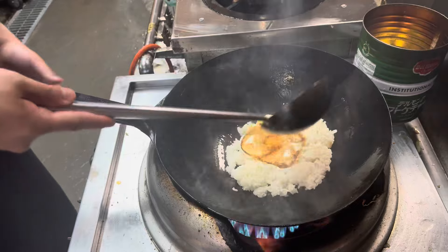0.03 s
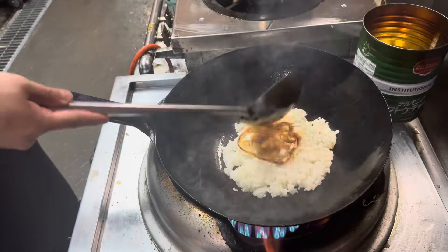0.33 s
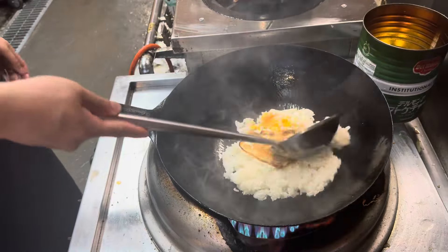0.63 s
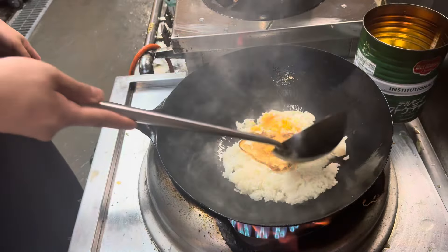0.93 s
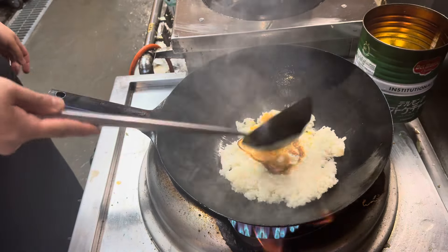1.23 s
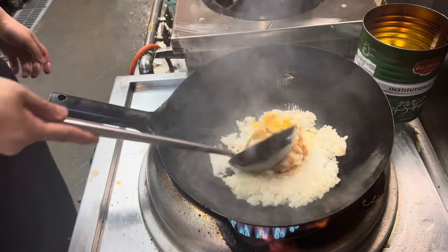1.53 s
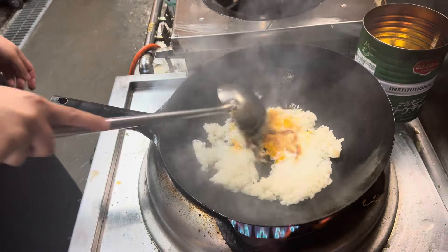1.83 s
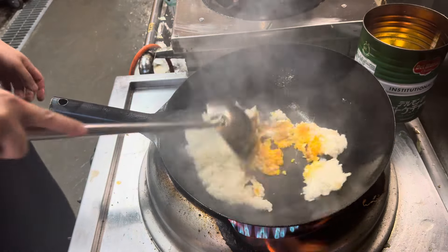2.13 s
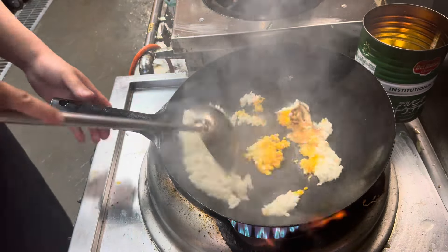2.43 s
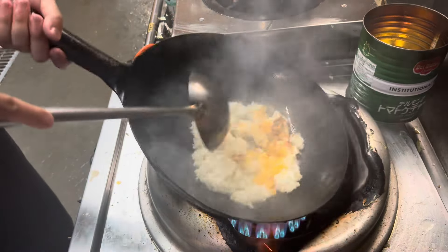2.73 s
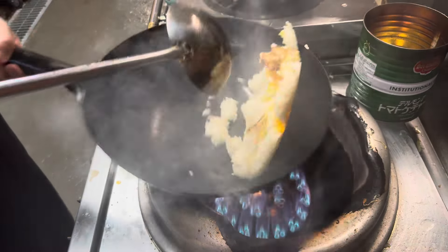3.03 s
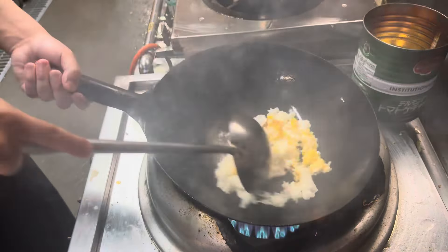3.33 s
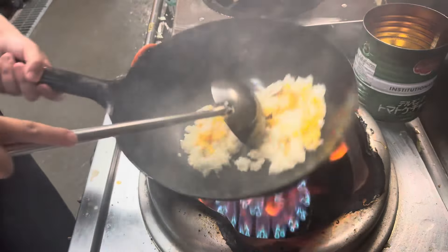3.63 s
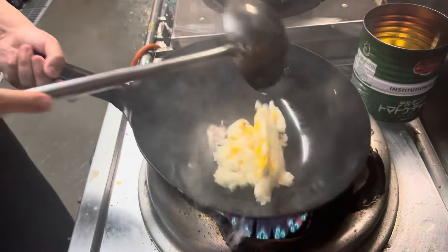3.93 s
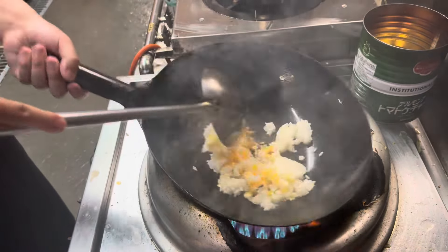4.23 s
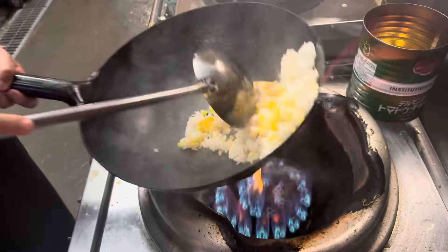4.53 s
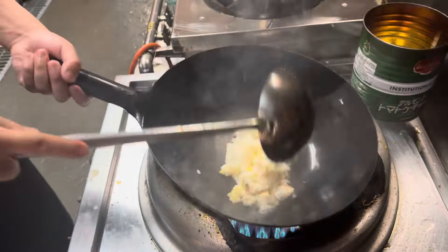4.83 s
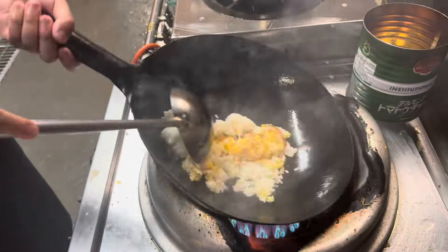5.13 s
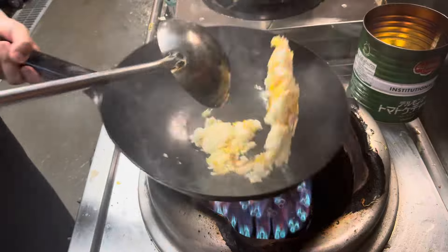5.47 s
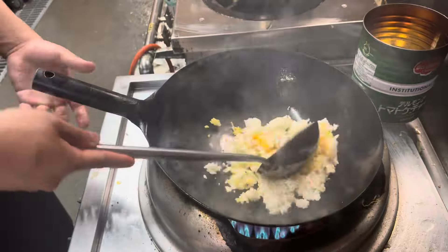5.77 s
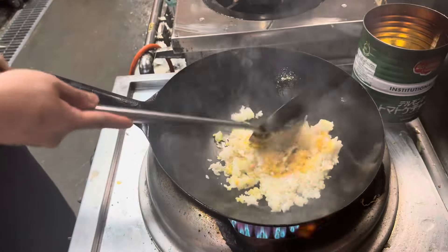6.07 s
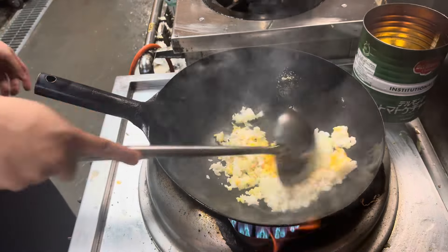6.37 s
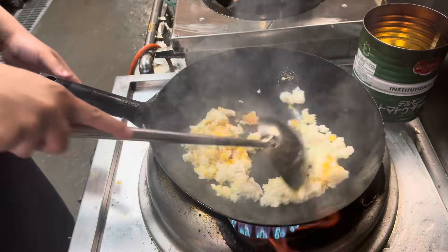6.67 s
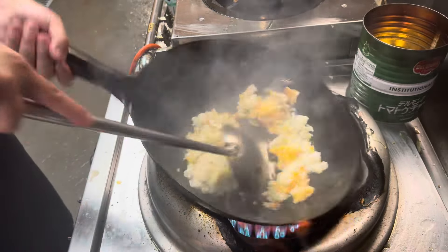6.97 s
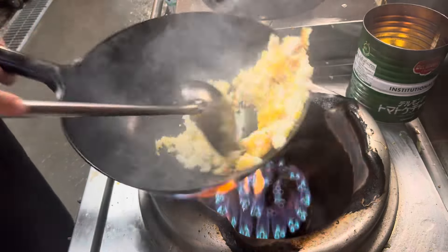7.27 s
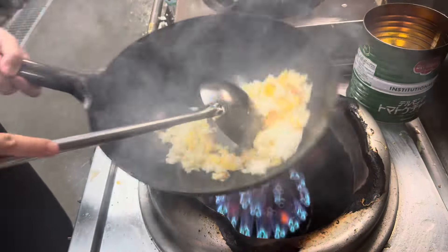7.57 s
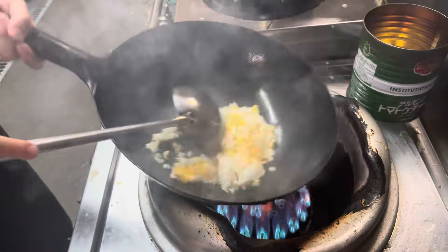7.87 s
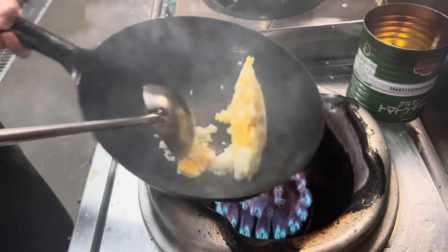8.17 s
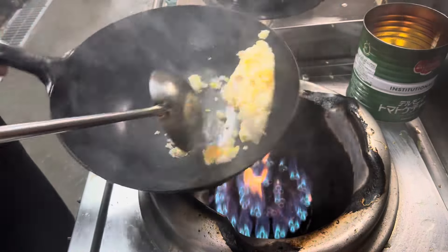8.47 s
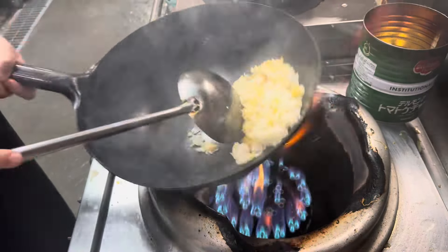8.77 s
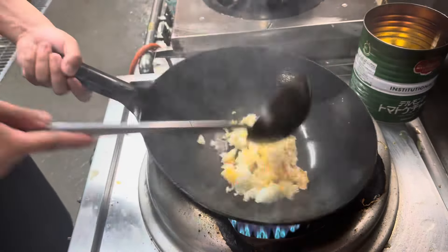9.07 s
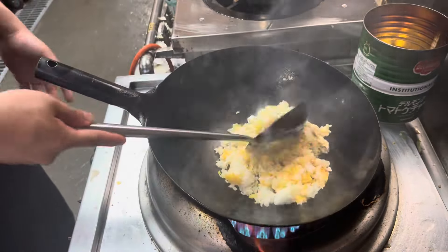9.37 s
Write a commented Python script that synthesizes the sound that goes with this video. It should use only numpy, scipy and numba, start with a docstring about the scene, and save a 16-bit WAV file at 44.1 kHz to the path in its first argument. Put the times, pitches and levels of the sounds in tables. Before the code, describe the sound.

Oil hisses and crackles in a wok of egg and rice above the steady rumble of a gas flame. Ladle strokes start soft and wet, then turn to bright scrapes and ringing clanks. Repeated tossing follows: the wok grinds, shudders and drops onto its iron ring with hollow, rattling thuds, and the sizzle dips briefly with each toss. The microphone is an arm's length away, with a short, dull kitchen echo.

```python
"""Egg and rice fry in a steel wok, close to a phone in a hard-walled kitchen. From the start a gas
burner roars, oil sizzles and spits, and a long ladle jabs and scrapes. After a second the wok begins
to grind over the iron burner ring; then the ladle clanks on it and squeals on bare steel. From about
2.7 s the cook tosses the rice again and again: the wok drops onto the ring and rattles to rest, or
slips off and wobbles, and the frying dips while the rice is in the air. It last lands at about 9 s."""
import sys
import numpy as np
from scipy import signal
from scipy.fft import rfft, irfft
from scipy.io import wavfile
from scipy.ndimage import uniform_filter1d
from numba import njit

SR = 44100
rng = np.random.default_rng(int(sys.argv[2]) if len(sys.argv) > 2 else 0)


def materialize(psi):
    """Save the field psi as 16-bit PCM at rate SR to the path in sys.argv[1].

    A 1-D psi becomes a single channel; in a 2-D psi each row is a channel.
    """
    bounded = np.clip(np.atleast_2d(psi).T, -1, 1)
    quanta = np.round(bounded * 32767).astype(np.int16)
    wavfile.write(sys.argv[1], SR, quanta)


N = 423360  # 9.6 s
TIME = np.arange(N) / SR
AGE = np.arange(SR) / SR  # one second, counted from a blow
MIC_LAG_S = 5.3e-5

# the ladle's natural tones; ring time is the time to fade by 60 dB: (pitch [Hz], level [dB], ring time [s])
LADLE_TONES = [(2000, -13, .26), (2262, -13, .25), (2410, -8, .19), (2453, -5, .22), (2545, -8, .3),
               (2633, -7, .35), (2816, -4, .22), (2880, -11, .2), (2978, -4, .16), (3150, -7, .25),
               (3285, -7, .25), (3490, -6, .3), (3660, -7, .3), (3770, -5, .2), (3960, -7, .3),
               (4030, -4, .17), (4120, -2, .2), (4430, -6, .2), (4600, -3, .24), (4787, -1, .16),
               (5280, -1, .2), (6131, -1, .2), (6400, -4, .2), (7235, -4, .14)]
# the wok's natural tones: (pitch [Hz], level [dB], ring time [s])
WOK_TONES = [(184, 2, .45), (243, -2, .4), (294, -5, .4), (363, -3, .35), (449, -2, .45), (506, -2, .45),
             (642, -3, .4), (696, -4, .37), (734, -4, .45), (816, -9, .38), (979, -9, .25), (1136, -14, .3),
             (1219, -9, .36), (1556, -17, .35), (1825, -19, .4)]
# the low grinding noise of the wok: (frequency [Hz], level [dB])
GRIND_SPECTRUM = [(110, 6), (190, 7), (380, 7.5), (600, 1.5), (1000, -11), (1600, -48), (3000, -21)]
# the wok lands on the burner ring; the last levels are relative to the first:
# (time [s], level [dB], rattle length [s], rattle [dB], thud pitch [Hz], rim note [dB], snap [dB])
WOK_LANDINGS = [(2.679, -5, 0.043, -17, 580, -34, -24), (3.195, -4, 0.061, -9.5, 643, -21, -33),
                (3.5115, -7.5, 0.046, -31, 604, -30, -26), (3.9997, -3, 0.072, -12.5, 695, -4.5, -30),
                (4.833, -4.5, 0.079, -12.5, 704, -5.5, -32), (5.167, -15, 0.029, -21, 590, -24, -15),
                (5.614, -7, 0.075, -7.5, 620, 4.5, -11), (6.9632, -5.5, 0.037, -18.5, 566, -17, -17),
                (9.068, -7.5, 0.065, -17.5, 507, -8, -47)]


def undb(db):
    """Turn decibels into a factor to multiply by."""
    return 10 ** (np.asarray(db) / 20)


def unit(x):
    """Scale a signal to an average (rms) level of 1."""
    return x / np.sqrt(np.mean(x ** 2))


def curve(table):
    """Join (time, value) points with straight lines."""
    return np.interp(TIME, *np.transpose(table))


def add(track, s, sound):
    """Mix a sound into a track, starting at s seconds."""
    start = int(s * SR)
    track[start:start + len(sound)] += sound[:N - start]


def colour(x, spectrum):
    """Filter by (frequency [Hz], level [dB]) points, fading beyond them; white noise keeps its level."""
    hz, db = np.transpose(spectrum)
    f = np.maximum(np.fft.rfftfreq(x.shape[-1], 1 / SR), 1)
    ends = np.minimum(1, np.minimum(f / hz[0], hz[-1] / f)) ** 2
    gain = unit(ends * undb(np.interp(np.log(f), np.log(hz), db)))
    return irfft(rfft(x) * gain, x.shape[-1])


def passband(x, order, hz, kind):
    """Keep the "low", "high" or "band" part of a sound; a higher order cuts more steeply."""
    return signal.sosfilt(signal.butter(order, hz, kind, fs=SR, output="sos"), x)


@njit
def resonance(x, hz, q):
    """Keep a band around a moving pitch; a higher q makes it narrower."""
    out, band_state, low_state = np.empty(len(x)), 0., 0.
    for i in range(len(x)):
        g = np.tan(np.pi * hz[i] / SR)
        band = (band_state + g * (x[i] - low_state)) / (1 + g * (g + 1 / q))
        band_state = 2 * band - band_state
        low_state += 2 * g * band
        out[i] = band / q
    return out


def wander(rate):
    """A smooth random drift that heads for a new value `rate` times a second."""
    hold = int(SR / rate)
    steps = np.repeat(rng.standard_normal(N // hold + 1), hold)
    return unit(uniform_filter1d(uniform_filter1d(steps, hold), hold)[:N])


def clicks(per_s, spread_db):
    """Random tiny clicks, mostly small and a few large."""
    size = undb(spread_db * np.minimum(rng.exponential(size=N), 7))
    return unit((rng.random(N) < per_s / SR) * size * rng.choice([-1, 1], N))


def fade(t60):
    """Dying away after a blow, by 60 dB in t60 seconds."""
    return np.exp(-np.log(1000) * AGE / t60)


def ring(tones, spot_db=0.0):
    """Struck metal: fading tones whose balance varies at random, as with the spot that is hit."""
    hz, db, t60 = np.transpose(tones)
    gain = undb(db + spot_db * rng.standard_normal(len(db)))
    gain = gain / np.sqrt(np.sum(gain ** 2) / 2)
    return sum(g * fade(t) * np.sin(2 * np.pi * (f * AGE + rng.random()))
               for f, g, t in zip(hz, gain, t60))


def wash(spectrum, t60):
    """Countless overlapping tones, heard as a dying noise."""
    return colour(rng.standard_normal(SR), spectrum) * fade(t60)


def swoop(start_hz, end_hz, length):
    """Bending waves in sheet steel: the high ones arrive first, so the pitch falls."""
    progress = np.minimum(AGE / length, 1)
    hz = start_hz * (end_hz / start_hz) ** progress
    return np.sin(np.pi * progress ** 1.2) * np.sin(2 * np.pi * np.cumsum(hz) / SR)


def gesture(s, rise, hold, fall):
    """One movement of the hand: it builds up, holds and dies away (all in seconds)."""
    age = TIME - s
    return np.clip(age / rise, 0, 1) * np.exp(-np.clip((age - rise - hold) / fall, 0, 20))


def two_mics(x, lag):
    """The direct sound reaches the phone's right microphone slightly late."""
    delay = np.exp(-2j * np.pi * np.fft.rfftfreq(N, 1 / SR) * lag)
    return np.array([x, irfft(rfft(x) * delay, N)])


def diffuse(count):
    """Noise from all sides: the two microphones agree only in the bass."""
    mid, side = rng.standard_normal((2, count))
    side = passband(side, 2, 260, "high")
    return np.array([mid + side, mid - side])


def burner():
    """The gas flame roars and flutters over a low, wavering hum."""
    # the flame's roar: (frequency [Hz], level [dB])
    roar_spectrum = [(20, -38), (36, -26), (49, 5), (62, -7.5), (80, -2.5), (102, 2.5), (130, -1),
                     (180, -9.5), (235, -14), (290, -16.5), (500, -17.5), (900, -23.5), (1700, -26),
                     (6000, -46)]
    hum_hz = 50.3
    hum = unit(np.sin(2 * np.pi * hum_hz * TIME + .5 * wander(rate=6.8)))
    roar = unit(colour(diffuse(N), roar_spectrum))
    return roar * undb(-31.5 + .5 * wander(rate=14)) + undb(-47) * hum


def stirring():
    """How hard the food fries and how hard the ladle rubs: jabs and pushes raise both, tosses dip both."""
    # the food left to itself: (time [s], sizzle [dB])
    simmer = [(0, -37.5), (.8, -34.5), (1.6, -35), (2.3, -29.5), (3.1, -34.5), (5.1, -31.5), (6.25, -38.5),
              (7.1, -29), (8.5, -35), (9.6, -35.5)]
    # the ladle presses wet food on hot steel: (time [s], sizzle [dB], scrape [dB])
    jabs = [(0.148, -33.5, -31.5), (0.374, -24.5, -31.5), (0.587, -42, -36), (.85, -27, -39),
            (1.046, -38, -33.5), (1.275, -29, -37), (1.39, -35, -43), (1.495, -27.5, -35.5),
            (1.725, -32, -28.5), (2.68, -48, -44), (3.2, -38, -27), (3.512, -40, -27.5), (4.0, -42, -26),
            (5.159, -26, -28.5), (5.615, -34, -26), (5.733, -30.5, -30.5), (5.986, -32, -33.5),
            (6.198, -37, -32), (6.386, -35, -30.5), (6.76, -35, -45), (6.962, -46, -28.5),
            (7.375, -32, -29.5), (7.762, -23.5, -44), (8.145, -20.5, -26.5), (8.522, -20, -33),
            (9.361, -33, -30.5)]
    # the ladle pushes the rice across the pan: (time [s], rise [s], hold [s], sizzle [dB], scrape [dB])
    pushes = [(1.756, 0.06, 0.13, -28.5, -36), (2.014, 0.038, 0.058, -28.5, -32),
              (2.15, 0.027, 0.026, -29, -31.5), (2.31, 0.056, 0.018, -31, -34),
              (2.44, 0.025, 0.14, -30.5, -42), (2.754, 0.029, 0.14, -40, -40.5),
              (3.056, 0.03, 0.063, -32, -41), (3.266, 0.027, 0.022, -34, -31.5),
              (3.384, 0.04, 0.27, -32, -40), (3.835, 0.14, 0.032, -31.5, -33),
              (4.08, 0.018, 0.036, -76, -36), (4.278, 0.097, 0.12, -27.5, -34.5),
              (4.607, 0.16, 0.057, -34, -37.5), (4.767, 0.085, 0.033, -48, -31.5),
              (4.963, 0.1, 0.21, -33.5, -38), (5.44, 0.13, 0.044, -31, -40),
              (6.42, 0.061, 0.11, -29, -39.5), (6.702, 0.031, 0.18, -35.5, -37.5),
              (7.05, 0.078, 0.065, -31.5, -35), (7.422, 0.091, 0.13, -31.5, -39),
              (7.815, 0.034, 0.067, -29, -32.5), (8.198, 0.042, 0.042, -27.5, -32.5),
              (8.573, 0.037, 0.088, -32.5, -32), (8.885, 0.066, 0.15, -32.5, -40),
              (9.12, 0.031, 0.054, -31, -33.5)]
    # the tossed rice is off the steel: (time [s])
    tosses = [3.01, 3.75, 4.58, 5.38, 7.32, 7.67, 8.1, 8.48, 8.86]
    # separate noises add up as powers, which are levels squared
    heat = undb(curve(simmer)) ** 2
    rub = undb(-45.5) ** 2  # the ladle lying in the rice
    for s, sizzle_db, scrape_db in jabs:
        press = gesture(s, rise=.0039, hold=.0069, fall=.057)
        heat += (undb(sizzle_db) * press) ** 2
        rub += (undb(scrape_db) * press) ** 2
    for s, rise, hold, sizzle_db, scrape_db in pushes:
        heat += (undb(sizzle_db) * gesture(s, rise, hold, fall=.059)) ** 2
        rub += (undb(scrape_db) * gesture(s, rise, hold, fall=.06)) ** 2
    half_flight_s, dip_db = .071, -6
    airborne = sum(np.exp(-np.minimum(((TIME - s) / half_flight_s) ** 2, 20)) for s in tosses)
    return np.sqrt([heat, rub]) * undb(dip_db * airborne)


def pops(per_s):
    """Larger bubbles burst in the oil, each ringing a few cycles at its own pitch."""
    out, age = np.zeros(N), AGE[:SR // 50]
    for when, pitch, size in rng.random((int(per_s * N / SR), 3)):
        hz = 2000 * 3.3 ** pitch
        bubble = np.exp(-hz * age / 4) * np.sin(2 * np.pi * hz * age)
        add(out, when * N / SR, undb(16 * size) * bubble)
    return unit(out)


def sizzle(heat):
    """Water boils out through the oil in thousands of tiny bursts all over the pan, with single spits."""
    # single drops of oil burst: (time [s], level [dB])
    drops = [(.823, -2), (.865, -1), (.912, 0), (1.281, 5), (1.285, 6), (1.322, 0), (1.499, 4), (1.507, 1),
             (1.5245, 4), (2.111, -2), (2.130, 0)]
    # the sound of one such drop: (frequency [Hz], level [dB])
    spit_spectrum = [(1200, -1), (4000, -10), (7000, -5), (10500, 18), (12000, 3), (16000, -10)]
    # the hiss of frying: (frequency [Hz], level [dB])
    sizzle_spectrum = [(500, -15.5), (1000, -4), (1800, -19), (3000, -6), (4200, -4), (6300, 0.5),
                       (8000, -5), (10500, -12), (11500, 5), (13000, 6), (16000, 4.5)]
    # delay between the microphones for the near, middle and far part of the pan: (lag [s])
    patch_lags = [3.9e-5, 5.1e-5, 6.1e-5]
    heat = heat * undb(1.94 * wander(rate=31))
    spits = np.zeros(N)
    for s, db in drops:
        spits[int(s * SR)] = undb(db)
    bubbles = undb(-16) * heat * pops(per_s=110)
    out = two_mics(colour(spits, spit_spectrum) + bubbles, MIC_LAG_S)
    for lag in patch_lags:
        fine = clicks(per_s=2800, spread_db=2.7)
        coarse = undb(-7.5) * clicks(per_s=110, spread_db=2.8)
        steam = undb(-7) * rng.standard_normal(N)
        out += two_mics(heat * colour(fine + coarse + steam, sizzle_spectrum), lag)
    return out


def scrape(rub):
    """The ladle squelches through wet egg and rubs over bare steel, where tiny slips keep it ringing."""
    # how freely the ladle rings, muffled at first by wet egg: (time [s], level [dB])
    ring_freedom = [(0, -27), (1.7, -27), (2.4, 2), (6.1, -14), (6.7, 0.5), (9.6, -9)]
    # the scratch of steel on steel: (frequency [Hz], level [dB])
    scratch_spectrum = [(700, -17), (1500, -64), (2400, 7.5), (3200, -1.5), (4600, 12), (6500, 28.5),
                        (9000, 19)]
    slips = clicks(per_s=2000, spread_db=2.0) * rub * undb(1.56 * wander(rate=30))
    singing = 0
    for hz, db, _ in LADLE_TONES:
        # contact cuts each tone short, and the moving contact point feeds them in turn
        ping = unit(fade(t60=.035) * np.sin(2 * np.pi * hz * AGE))[:SR // 16] / np.sqrt(SR)
        feed = undb(db - 12 - 5 * np.log2(hz / 2500) + 3.5 * wander(rate=11))
        singing += feed * signal.oaconvolve(slips, ping)[:N]
    bare = undb(curve(ring_freedom))
    wet = np.maximum(1 - bare, 0)
    squelch = undb(-4) * wet * colour(slips, [(1200, -2), (1900, 1.5), (2800, -.5)])
    # the contact slides along the ladle's edge, so its pitch wanders
    edge_slips = clicks(per_s=2000, spread_db=2.0)
    edge_hz = 3950 * np.exp(.16 * wander(rate=13))
    edge = undb(-5) * rub * unit(resonance(edge_slips, edge_hz, q=7.0))
    scratch = undb(-.5) * colour(slips, scratch_spectrum)
    return scratch + edge + bare * singing + squelch


def drag():
    """The wok grinds over the rough iron ring, which muffles its tones; it also skids as it lands."""
    # the wok slides over the ring: (time [s], rise [s], hold [s], level [dB])
    slides = [(1.103, 0.15, 0.27, -41.5), (1.775, 0.18, 0.055, -26), (2.248, 0.059, 0.073, -37),
              (3.3, 0.092, 0.023, -32), (4.322, 0.058, 0.018, -34.5), (4.97, 0.064, 0.031, -38),
              (5.422, 0.11, 0.06, -36.5), (6.358, 0.036, 0.069, -43), (7.06, 0.059, .01, -37.5),
              (7.753, 0.065, 0.12, -39), (8.2, 0.059, 1, -42)]
    bumps = clicks(per_s=500, spread_db=2.5)
    singing = undb(-10) * unit(signal.fftconvolve(bumps, ring(WOK_TONES) * fade(t60=.15))[:N])
    slide_power = sum((undb(db) * gesture(s, rise, hold, fall=.13)) ** 2 for s, rise, hold, db in slides)
    skid_power = sum((undb(db - 27.5) * gesture(s - .15, rise=.15, hold=.047, fall=.15)) ** 2
                     for s, db, *_ in WOK_LANDINGS)
    level = np.sqrt(slide_power + skid_power) * undb(2.5 * wander(rate=20))
    return (colour(bumps, GRIND_SPECTRUM) + singing) * level


def rasps():
    """In a quick push, steel sticks and slips on steel: noise swells around one tone of the bowl."""
    # short, hollow rasps: (time [s], level [dB], length [s], pitch [Hz])
    strokes = [(1.345, -36, 0.095, 523), (1.657, -33.5, 0.073, 870), (1.737, -22.5, 0.071, 447),
               (1.963, -27, 0.12, 1000), (2.572, -28, 0.025, 394), (2.781, -26.5, 0.047, 497),
               (3.107, -28.5, 0.035, 403), (3.154, -21.5, 0.053, 342), (3.33, -25, 0.048, 915),
               (3.883, -29.5, 0.043, 390), (3.955, -22.5, 0.058, 317), (4.741, -30, 0.021, 413),
               (4.792, -28, 0.034, 467), (6.724, -39, 0.093, 464), (7.086, -29.5, 0.04, 524),
               (9.084, -24.5, 0.069, 198)]
    out = np.zeros(N)
    for s, db, length, hz in strokes:
        grit = colour(rng.standard_normal(SR), [(hz / 2, -14), (hz, 0), (hz * 2, -17)])
        swell = np.sin(np.pi * np.minimum(AGE / length, 1))
        add(out, s, undb(db) * grit * swell)
    return out


def struck_ladle(spot_hz, boost_db=6, width_octaves=.022):
    """The ladle's tones, louder near the pitches that one struck spot brings out."""
    tones = []
    for hz, db, t60 in LADLE_TONES:
        octaves_away = min(abs(np.log2(hz / f)) for f in spot_hz)
        tones.append((hz, db + boost_db * np.exp(-(octaves_away / width_octaves) ** 2), t60))
    return tones


def clack():
    """Hard metal against steel: a short, dry burst of noise."""
    spectrum = [(900, -6), (1500, 0), (2300, 0), (3200, -9), (4800, -5), (8000, -16)]
    return undb(-16) * wash(spectrum, t60=.05)


def clanks():
    """The ladle meets the wok: a crack and bright steel tones over a hollow thud."""
    # ladle blows, each bringing out three tones:
    # (time [s], ladle [dB], wok thud [dB], low tone [Hz], middle tone [Hz], high tone [Hz])
    blows = [(1.728, -22.5, -13, 2816, 3285, 4600), (3.2894, -18.5, -16.5, 2816, 3770, 4600),
             (4.1129, -30, -22.5, 2340, 2545, 4430), (4.911, -24.5, -33, 2816, 2978, 4600),
             (5.7358, -41, -21.5, 2500, 2978, 3770), (6.3917, -24.5, -24.5, 2500, 4787, 6131),
             (7.3783, -17, -17.5, 2500, 2978, 4120), (7.763, -15.5, -11, 2545, 2978, 3285),
             (8.1516, -15.5, -15, 2350, 2816, 4030), (8.528, -13.5, -14, 2978, 3770, 4600)]
    # the noisy part of the ladle's ringing: (frequency [Hz], level [dB])
    clang_spectrum = [(900, -45), (1800, -11), (2400, -22), (3500, -4), (4600, 17), (6300, 13), (8500, -6),
                      (15000, -45)]
    crack_spectrum = [(1200, -12), (3000, -1), (7000, 0), (9500, -4), (13000, 3), (16000, 3)]
    bowl_spectrum = [(170, 10.5), (280, -7.5), (550, -.5), (800, -7), (1300, -21)]
    out = np.zeros(N)
    for s, ladle_db, thud_db, *spot_hz in blows:
        steel = undb(-.5) * ring(struck_ladle(spot_hz), spot_db=1.5) * fade(t60=.5)
        steel += undb(-10) * wash(clang_spectrum, t60=.1)
        crack = undb(6) * wash(crack_spectrum, t60=.014)
        steel += undb(-31) * ring([(3957, 0, 3.0)])  # the long shaft sings on faintly
        hollow = undb(4) * swoop(start_hz=849, end_hz=312, length=.00634) + undb(-15) * ring(WOK_TONES)
        hollow += undb(-15) * wash(bowl_spectrum, t60=.74) + undb(-12) * ring([(504, 0, .33)])
        add(out, s, undb(ladle_db) * (steel + crack))
        add(out, s, undb(thud_db) * (hollow + clack()))
    return out


def squeals():
    """Quick slips of the ladle's edge feed one narrow tone, which wavers as the contact moves."""
    # the edge bites bare steel: (time [s], level [dB], length [s], pitch [Hz])
    bites = [(2.35, -35.5, .1, 3000), (2.37, -36, .07, 4000), (2.47, -35.5, .09, 4400),
             (6.73, -38, .045, 2600), (6.755, -33, .05, 3900), (6.84, -37, .09, 2850),
             (6.9, -38, .06, 3900), (7.08, -38, .15, 2455), (8.6, -41, .16, 2200)]
    out = np.zeros(N)
    waver = np.exp(.02 * wander(rate=30))
    slips = clicks(per_s=1200, spread_db=2.0)
    for s, db, length, hz in bites:
        span = slice(int(s * SR), int((s + length) * SR))
        tone = unit(resonance(slips[span], hz * waver[span], q=11.0))
        add(out, s, undb(db) * tone * np.sin(np.pi * AGE[:len(tone)] / length))
    return out


def thud(hz):
    """One touch of wok and ring: a quick falling bend of the steel and a short noise; lower is duller."""
    # the noise of struck sheet steel: (frequency [Hz], level [dB])
    sheet_spectrum = [(70, -21), (170, -17), (280, -13), (420, 6), (700, -28), (1050, 4), (1500, 0),
                      (2200, -21), (3200, 1), (4800, 8), (6500, 11.5), (10000, -24)]
    blow = undb(4.5) * swoop(start_hz=1.9 * hz, end_hz=.55 * hz, length=3.1 / hz)
    blow += undb(-16) * wash(sheet_spectrum, t60=.15)
    return (blow + passband(blow, 1, hz, "low")) / 2


def snap():
    """The first hard touch of iron sends a brief, bright bend through the steel."""
    return swoop(start_hz=2700, end_hz=1500, length=.005)


def rattle(length, db, count=10):
    """Times and sizes of a first touch and the faint chatter after it."""
    when = .007 + length * (np.arange(count) + rng.random(count)) / count
    size = undb(db) * unit(rng.uniform(.5, 1, count) * np.linspace(1, .6, count))
    return zip(np.append(0, when), np.append(1, size))


def landings():
    """Each touch of the iron ring sends a thud through the wok; the rattle sets bowl and rim ringing."""
    # the rim's natural tones: (pitch [Hz], level [dB], ring time [s])
    rim_tones = [(979, -7, .25), (1012, 0, .32), (1075, -12, .18), (1219, -10, .3)]
    # the wok bounces hard before it settles: (time [s], level [dB], thud pitch [Hz])
    rebounds = [(2.692, -14.5, 470), (2.6991, -14, 520), (3.2076, -12, 590), (3.2353, -14, 720),
                (3.521, -13.5, 560), (4.0118, -19, 700), (4.03, -12, 800), (4.0374, -10, 740),
                (4.057, -10, 780), (4.063, -12, 710), (4.846, -12, 537), (4.857, -16, 890),
                (4.8622, -11.5, 470), (4.8721, -8.5, 990), (4.894, -21, 490), (5.626, -7, 544),
                (5.637, -10, 450), (5.648, -8.5, 860), (5.6563, -13, 636), (5.6645, -16, 735),
                (6.976, -17, 516), (9.0955, -11, 507), (9.1068, -12.5, 444), (9.122, -10.5, 850)]
    bend_delay_s, rim_rise_s = .0018, .022
    out, rim = np.zeros((2, N))
    for s, db, length, rattle_db, thud_hz, rim_db, snap_db in WOK_LANDINGS:
        thuds, energy = np.zeros((2, 2 * SR))
        for when, size in rattle(length, rattle_db):
            # each touch is on another spot, so its pitch differs
            detune = np.exp(.32 * rng.standard_normal()) if when else 1
            add(thuds, when, size * thud(thud_hz * detune))
            add(energy, when, np.full(SR, size ** 2))
        swing = np.sqrt(energy[:SR])
        bowl = undb(-17) * swing * ring(WOK_TONES, spot_db=2)
        rim_note = swing * (1 - np.exp(-AGE / rim_rise_s)) * ring(rim_tones) / 2
        add(out, s + bend_delay_s, undb(db) * (thuds[:SR] + bowl + clack() + undb(snap_db) * snap()))
        add(rim, s + bend_delay_s, undb(db + rim_db) * rim_note)
    for s, db, thud_hz in rebounds:
        add(out, s + bend_delay_s, undb(db) * (thud(thud_hz) + clack()))
    return out, rim


def flexes():
    """Freed from the iron ring, the wok gives a low, shuddering wobble and its handle rings thinly."""
    # the wok slips off the ring: (time [s], level [dB], handle relative to that level [dB])
    releases = [(2.968, -19.5, -4.5), (3.738, -20.5, -13.5), (4.586, -17.5, -13), (5.347, -31, -15),
                (7.257, -29, -11), (7.457, -22.5, -7), (8.225, -25, -27), (8.819, -34.5, -8)]
    out = np.zeros(N)
    for s, db, handle_db in releases:
        shudder = .7 + .75 * colour(rng.standard_normal(SR), [(30, 0), (120, -2)])
        bend = swoop(start_hz=386, end_hz=206, length=.049)
        bend += undb(-23) * swoop(start_hz=722, end_hz=337, length=.043)
        bend += undb(9) * swoop(start_hz=242.4, end_hz=138.4, length=.136)  # the slowest waves linger
        wobble = undb(-3) * (bend * shudder * fade(t60=.28) + wash(GRIND_SPECTRUM, t60=.17))
        handle = undb(-4) * wash([(2600, -14), (3200, 0), (3900, -14)], t60=.4)
        handle *= np.minimum(AGE / .008, 1)  # a soft start
        knock = undb(-6) * thud(hz=430)
        add(out, s, undb(db) * (knock + wobble + undb(handle_db) * handle))
    return out


def kitchen(x):
    """Steel and tiles add a short, dull echo that starts after 7 ms."""
    tail = unit(diffuse(SR) * fade(t60=.22) * (AGE > .007)) / np.sqrt(SR)
    tail = passband(tail, 4, 6800, "low")
    return undb(-2.5) * signal.fftconvolve(x[None], tail, axes=1)[:, :N]


def scene():
    """Everything sounds from the stove, an arm's length away; the flame and the rim's note get no echo."""
    heat, rub = stirring()
    frying = sizzle(heat)
    thuds, rim = landings()
    metal = thuds + clanks() + flexes() + drag() + rasps() + scrape(rub) + squeals()
    return burner() + frying + two_mics(metal + rim, MIC_LAG_S) + kitchen(metal + frying[0])


def record(dry):
    """The phone widens the middle pitches, rounds the loudest peaks and cuts the highest treble."""
    widen_hz, widen_db, top_hz = (750, 1600), 3, 15850
    side = passband((dry[0] - dry[1]) / 2, 1, widen_hz, "band")
    wide = dry + (undb(widen_db) - 1) * np.array([side, -side])
    treble_cut = signal.ellip(10, .2, 80, top_hz, fs=SR, output="sos")
    return signal.sosfilt(treble_cut, np.tanh(wide))


dry = scene()
out = record(dry)
materialize(out)
```